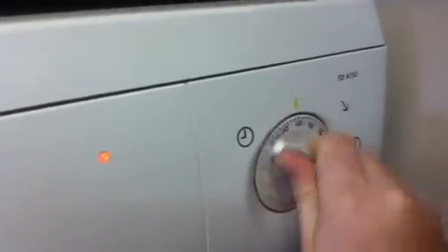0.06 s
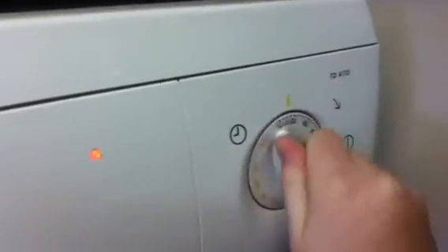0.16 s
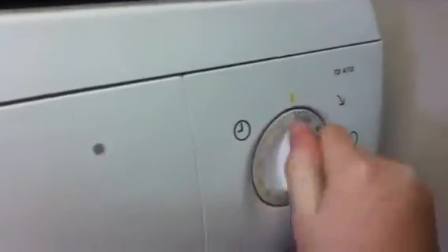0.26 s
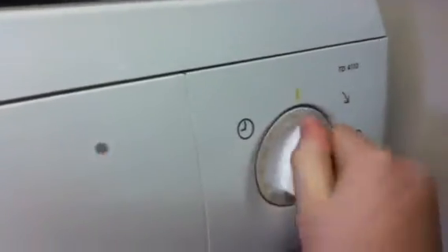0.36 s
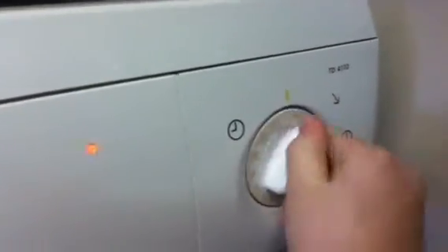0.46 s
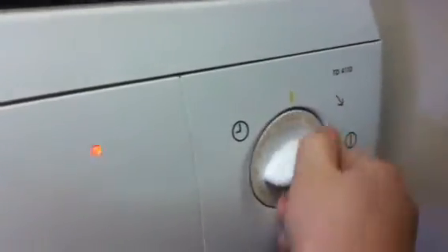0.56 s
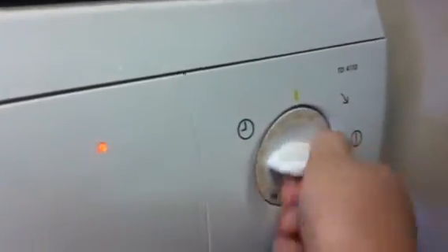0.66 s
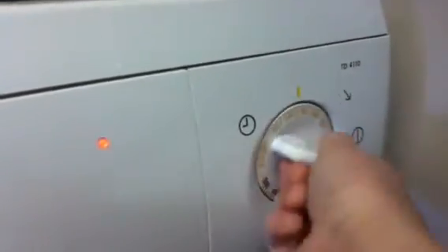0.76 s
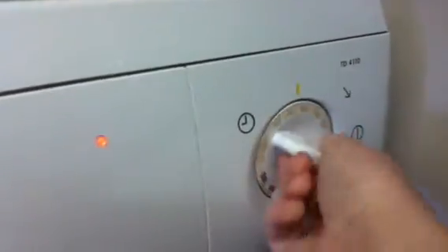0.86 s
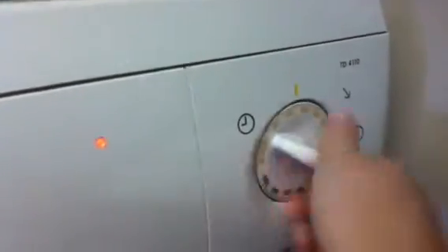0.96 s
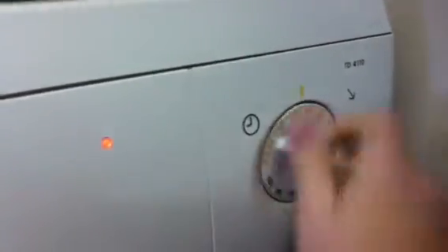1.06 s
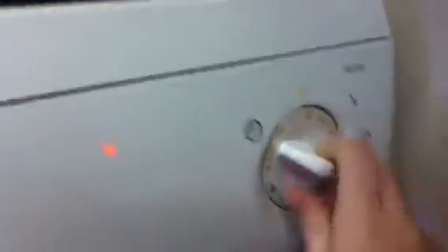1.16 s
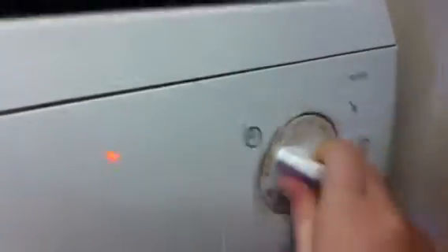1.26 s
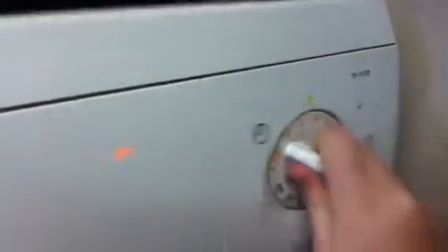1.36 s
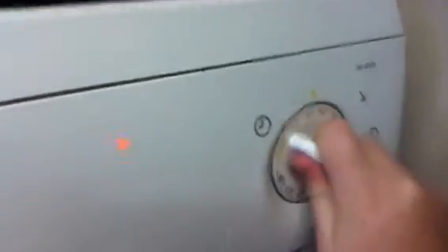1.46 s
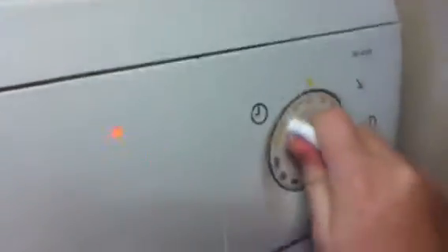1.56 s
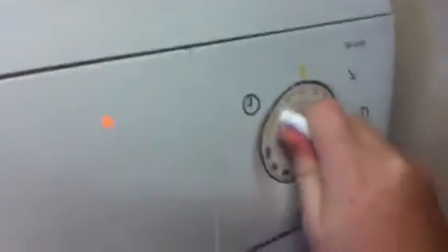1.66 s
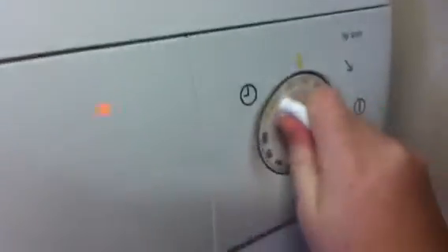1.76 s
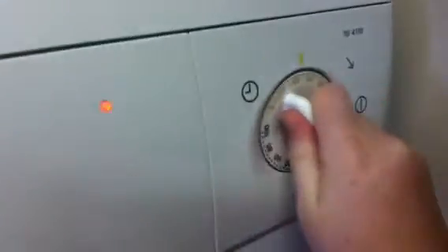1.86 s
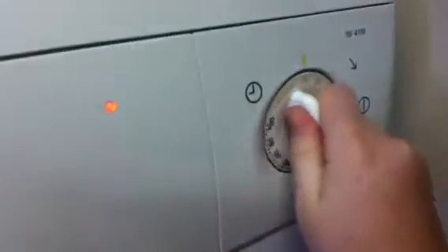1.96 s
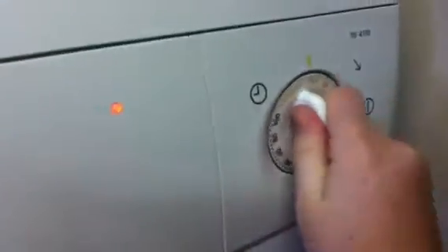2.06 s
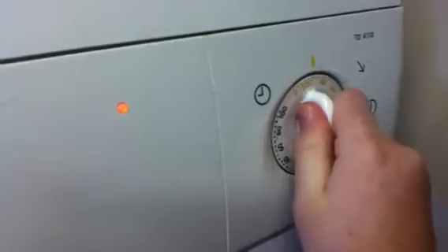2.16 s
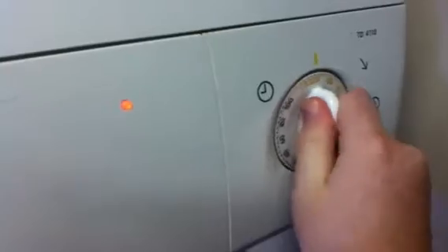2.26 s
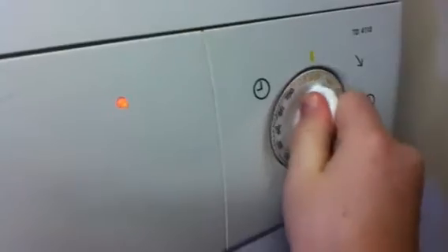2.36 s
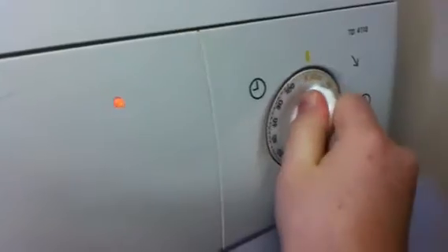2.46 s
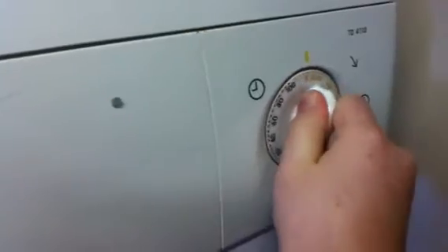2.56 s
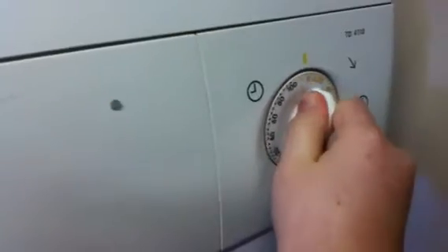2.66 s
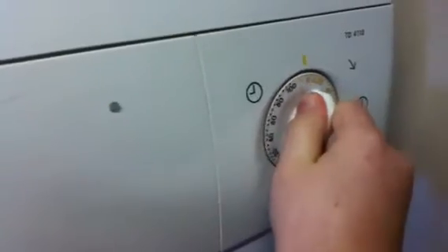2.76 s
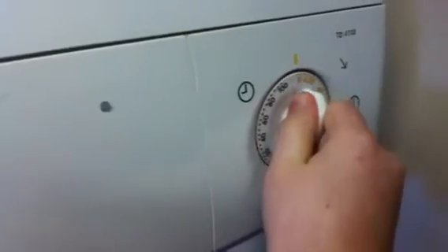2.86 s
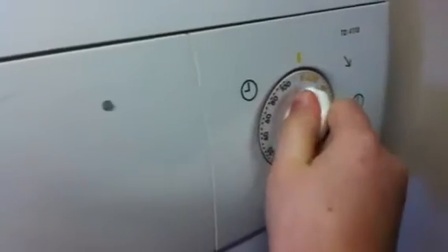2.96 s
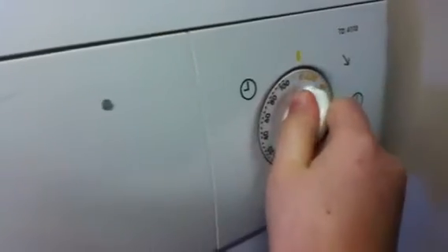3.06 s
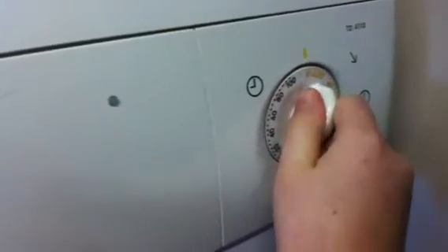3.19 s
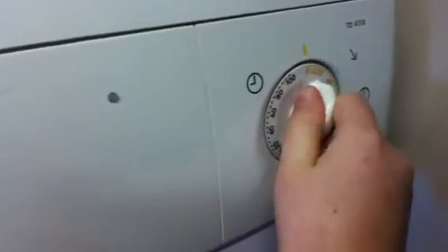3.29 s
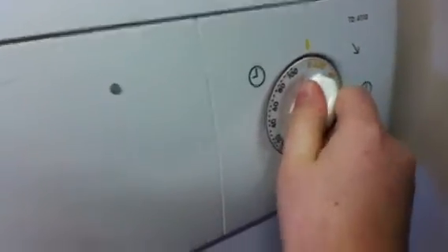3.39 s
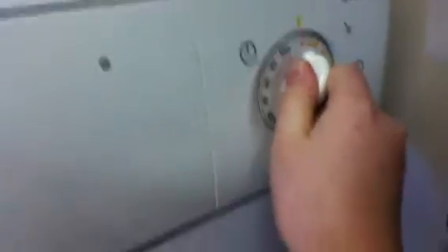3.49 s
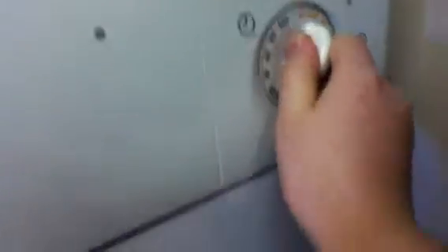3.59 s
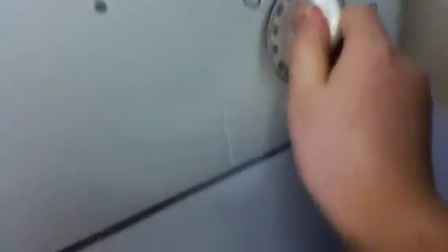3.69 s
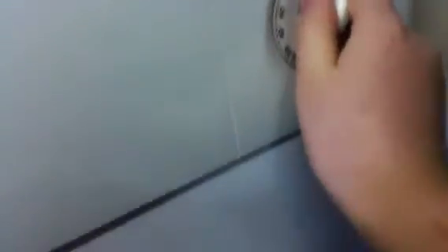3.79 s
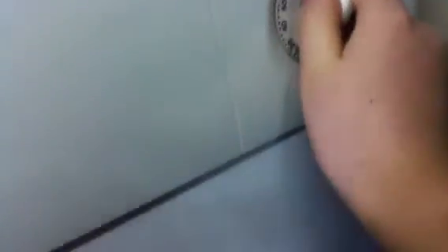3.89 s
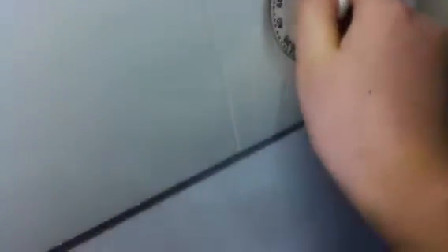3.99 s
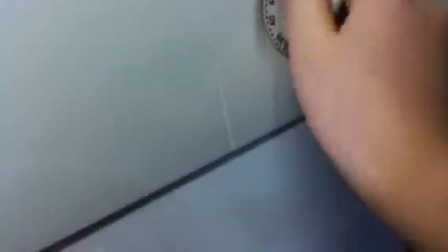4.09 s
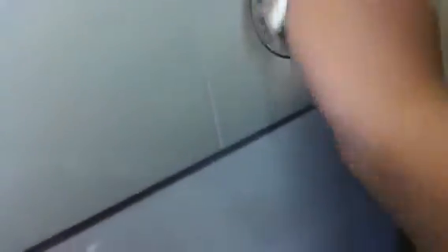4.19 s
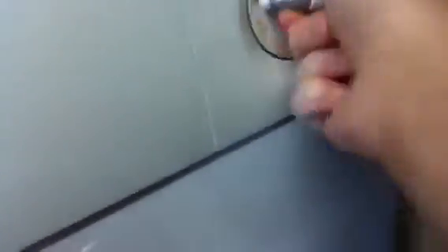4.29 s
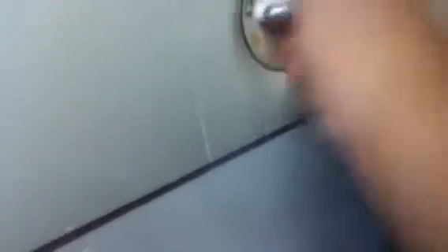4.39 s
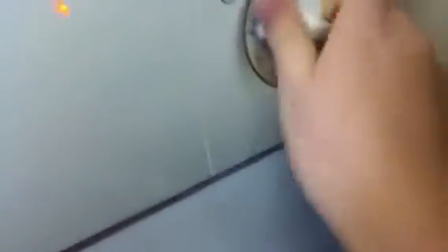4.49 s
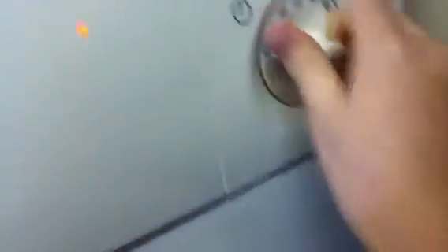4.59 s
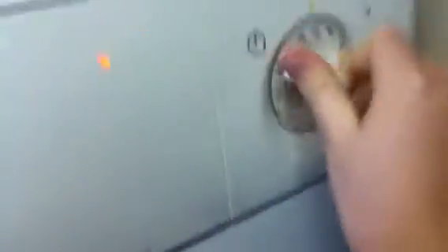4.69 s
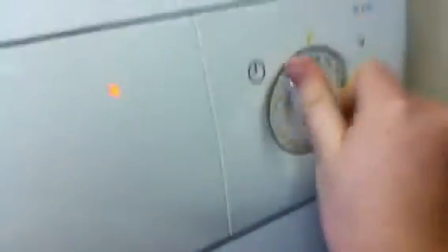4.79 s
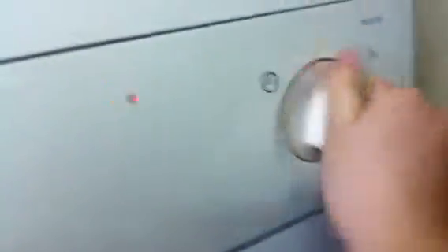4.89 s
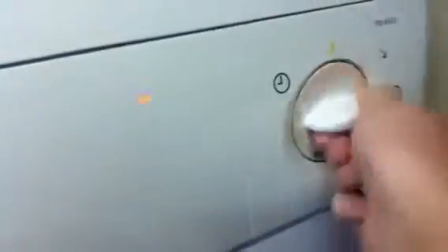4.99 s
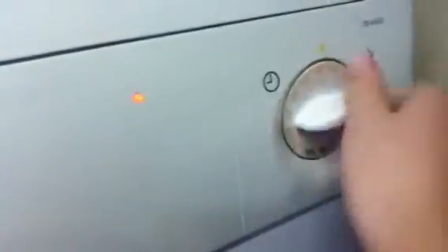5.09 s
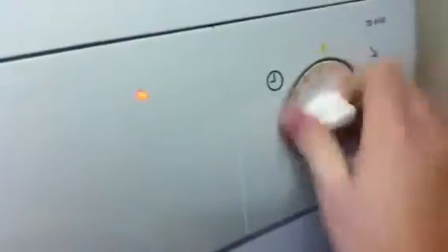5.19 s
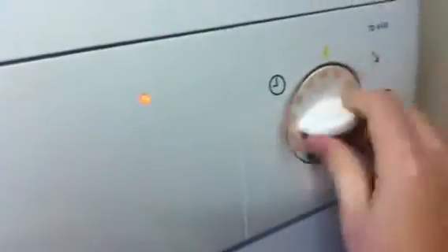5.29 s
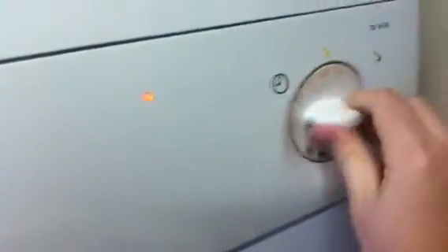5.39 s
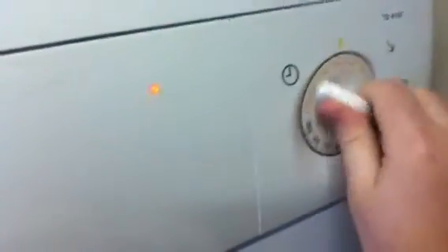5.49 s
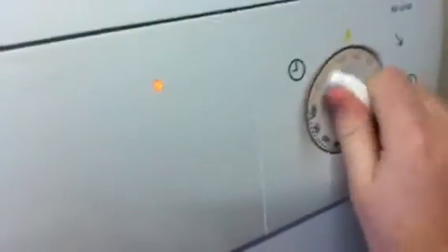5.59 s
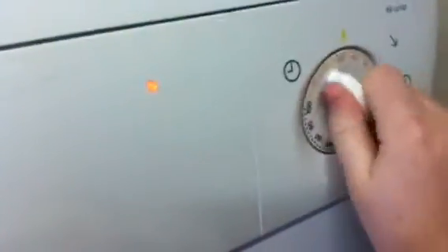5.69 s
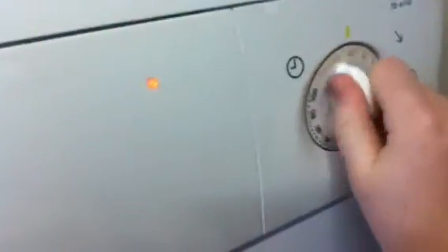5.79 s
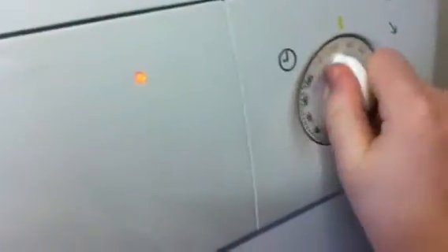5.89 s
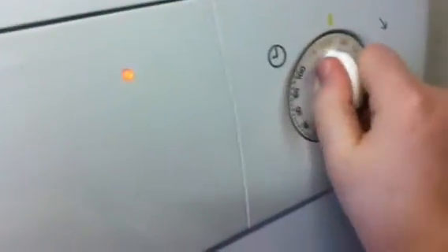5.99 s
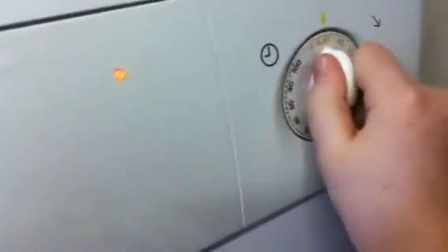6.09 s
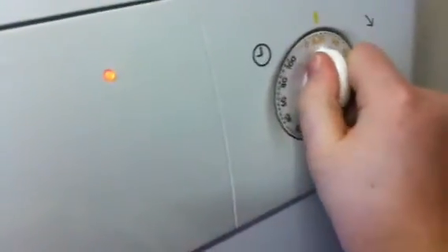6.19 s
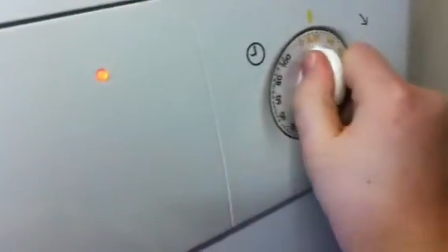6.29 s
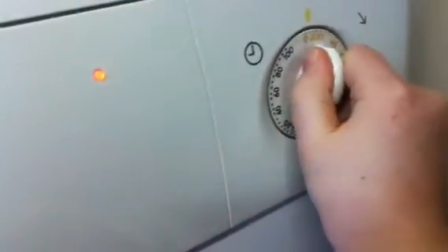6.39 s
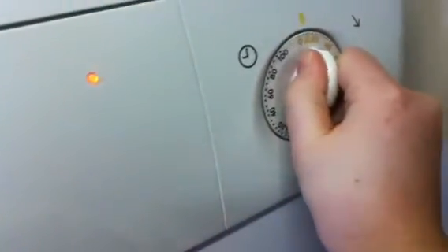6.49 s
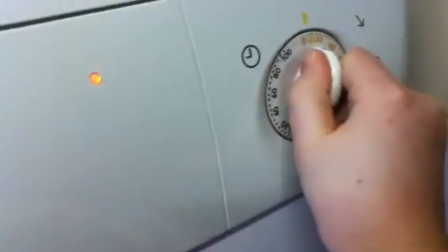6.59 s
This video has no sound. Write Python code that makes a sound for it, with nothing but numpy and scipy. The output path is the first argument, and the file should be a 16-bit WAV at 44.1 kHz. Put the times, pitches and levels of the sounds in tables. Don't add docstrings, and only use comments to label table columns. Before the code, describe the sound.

Close microphone in a small, hard room with low rumble and faint hiss. Skin rubs and fingers tap a knob, then from 0.14 s a timer dial ratchets: hard, bright snaps with a plastic knock and hollow sheet-metal resonance, about fifty a second at the fastest, easing to thirty or so, ending near 0.95 s. Dull finger taps and regripping follow from 1.05 to 1.53 s, the strongest at 1.25 s. From 1.63 to 2.77 s come separate clacks, unevenly spaced, some with a clear ping; the last leaves a faint steel hum. Near quiet until 4.2 s. A quick flick rattles from 4.27 to 4.4 s, fingers knock around 4.5 s, and a dense, scraping spin runs from 4.8 to 5.09 s. More taps until 5.44 s, a short twist of clicks from 5.5 to 5.67 s, then slow single clicks until 6.48 s.

```python
import sys
import numpy as np
from scipy import signal
from scipy.fft import rfft, irfft, next_fast_len
from scipy.io import wavfile
from scipy.ndimage import uniform_filter1d, map_coordinates

SR = 44100
rng = np.random.default_rng(int(sys.argv[2]) if len(sys.argv) > 2 else 0)


def gain_from_decibels(decibels):
    exponent = np.asarray(decibels, float) / 20
    return 10 ** exponent


def to_wav(sig):
    pcm = np.clip(np.atleast_2d(sig), -1, 1) * 32767
    pcm = np.round(pcm).astype(np.int16)
    wavfile.write(sys.argv[1], SR, pcm.T)


N = 293265
LENGTH = 16384
DELAY_S = 0.0012


def along(points, hz):
    f, v = np.transpose(points)
    return np.interp(np.log(hz + 1), np.log(f + 1), v)


def unit(x):
    return x / np.sqrt(np.mean(np.abs(x) ** 2, axis=-1, keepdims=True) + 1e-20)


def coloured(x, spectrum):
    m = next_fast_len(len(x) + LENGTH)
    gain = gain_from_decibels(along(spectrum, np.fft.rfftfreq(m, 1 / SR)))
    return irfft(rfft(x, m) * gain, m)[:len(x)]


def dying(noise, t60s, size):
    hz, t, z = signal.stft(noise, SR, nperseg=size)
    decay = gain_from_decibels(-60 * t / along(t60s, hz)[:, None])
    return signal.istft(z * decay, SR, nperseg=size)[1][..., :noise.shape[-1]]


def mode(centre_hz, width_hz):
    f = np.fft.rfftfreq(LENGTH, 1 / SR)
    damping = 1j * f * width_hz
    return damping / (centre_hz ** 2 - f ** 2 + damping)


def body(modes, count, scatter_db):
    shapes = [(-1) ** k * gain_from_decibels(db) * mode(hz, width) for k, (hz, width, db) in enumerate(modes)]
    strengths = gain_from_decibels(scatter_db * rng.standard_normal((count, len(modes))))
    return strengths @ np.array(shapes)


def placed(times, sounds):
    start = np.round((np.asarray(times) + DELAY_S) * SR).astype(int)
    at = start[:, None] + np.arange(sounds.shape[1])
    return np.bincount(at.ravel(), sounds.ravel(), N + 2 * LENGTH)[:N]


def swells(rows, rise_s, cycles):
    s, db, hz = np.transpose(rows)[:, :, None]
    t = np.arange(2048) / SR
    swell = t / (rise_s + cycles / hz)
    tone = np.sin(2 * np.pi * (hz * t + rng.random(s.shape)))
    return placed(s[:, 0], gain_from_decibels(db) * swell * np.exp(1 - swell) * tone)


# pitch_hz, t60_s
RINGING = [(200, 0.19), (700, 0.23), (1800, 0.16), (4800, 0.092), (8000, 0.064), (13000, 0.067)]
# delay_ms after the landing, level_db
BOUNCES = [
    (.5, -10),
    (1.6, -4),
    (3.399, -7),
]


def blows(times, ringing, diffuse, rise_s, kick_db, hit_db):
    t = np.arange(LENGTH) / SR
    shake = dying(rng.standard_normal((len(times), 2, LENGTH)), RINGING, size=128)
    kick = 1 + gain_from_decibels(kick_db) * np.exp(-t / 0.0039)
    shake = rfft(shake * (1 - np.exp(-t / rise_s)) * kick)
    late = 1 + 0.15 * rng.standard_normal((len(times), 1))
    hz = np.fft.rfftfreq(LENGTH, 1 / SR)
    for ms, db in BOUNCES:
        shake[:, 0] += gain_from_decibels(hit_db + db) * np.exp(-2j * np.pi * hz * late * ms / 1000)
    sounds = irfft(shake * np.stack([ringing, diffuse], axis=1), LENGTH)
    sounds = sounds * np.clip((t[-1] - t) * 10 - 0.1, 0, 1)
    return np.array([placed(times, sounds[:, 0]), placed(times, sounds[:, 1])])


# pitch_hz, level_db per Hz
QUIET = [(25, -11.5), (50, -5.5), (120, 0), (250, -2.5), (450, -9.5), (800, -13), (2000, -17.5),
         (4000, -22), (8000, -21.5), (13000, -27), (15500, -28), (16300, -43)]
# time_s, level_db
QUIET_LEVEL = [(0, -58.5), (1.4, -54.5), (3.2, -60), (4.1, -59.5), (4.7, -56.5), (6.65, -55.5)]


def quiet():
    drift_db = 0.7 * map_coordinates(rng.standard_normal(80), [np.linspace(1, 78, N)])
    level_db = np.interp(np.arange(N) / SR, *np.transpose(QUIET_LEVEL)) + drift_db
    return gain_from_decibels(level_db) * unit(coloured(rng.standard_normal(N), QUIET))


# start_s, end_s, level_db
RUB = [
    (0, -0.002, -47),
    (0.157, 1.09, -50),
    (1.22, 1.32, -49.5),
    (1.6, 2.8, -74),
    (4.203, 4.452, -58),
    (4.548, 4.74, -52),
    (4.8, 5.142, -51),
    (5.3, 6.638, -70),
]
# pitch_hz, level_db per Hz
SKIN = [(150, -5.5), (400, 6.5), (1500, -2.5), (3000, -13.5), (6500, -16), (10000, -23), (15000, -39)]


def rubbing():
    start, end, db = np.transpose(RUB)[:, :, None]
    t = np.arange(N) / SR
    outside_s = np.abs(t - np.clip(t, start, end))
    level_db = np.max(db - 119.5 * outside_s, axis=0)
    unevenness = unit(uniform_filter1d(rng.standard_normal(N), 200))
    slips = rng.standard_normal(N) * gain_from_decibels(3.4 * unevenness)
    return gain_from_decibels(level_db) * unit(coloured(slips, SKIN))


# time_s, strength_db, hardness (-1 pad to 1 nail)
TAPS = [(.0082, -46.5, -0.59), (0.041, -50.5, -1), (0.084, -38, 0.55), (.096, -31, -0.1),
        (1.054, -35, 0.39), (1.0675, -28.5, 0.27), (1.0837, -31, -0.25), (1.0975, -27, -0.24),
        (1.138, -33, 0.35), (1.2361, -23.5, -0.08), (1.2486, -19.5, -0.05), (1.2751, -21, 0.25),
        (1.4729, -25, 0.13), (1.5325, -23, 0.065), (3.6263, -60, 1), (4.1727, -48, 0.27),
        (4.228, -29.5, 0.34), (4.4598, -25.5, 0.15), (4.4663, -28, -0.85), (4.5126, -45, 0.56),
        (4.5267, -34, 0.4), (4.5656, -51, 0.8), (5.156, -22, -0.45), (5.1617, -26, 0.47),
        (5.209, -29.5, -0.21), (5.2335, -27.5, -0.054), (5.282, -35, -0.81), (5.2871, -19, 0.34),
        (5.396, -33, -0.66), (5.4411, -25, 0.075)]
# pitch_hz, width_hz, level_db
KNOB = [(326, 47, 0.5), (656, 95, 5.5), (1050, 270, 2), (1310, 330, 0.5), (1548, 160, 2.5),
        (2150, 580, -5.5)]
NAIL = [(2800, 1200, -4), (3700, 880, -0.5), (4810, 930, -2.5), (6910, 2200, -6.5), (10800, 4500, -25)]
CABINET = [(195, 30.8, 3), (304.4, 36.7, 2), (351, 68.5, -1.5), (493, 46, -3.5), (639, 39.7, -2.5),
           (840, 66, -3)]
# time_s, level_db
LEAN = [(0, -1), (.3, 1.5), (.6, 0), (.95, 0), (1.25, -2.5), (1.6, 2), (1.9, -1), (2.2, -3), (2.55, -0.5),
        (2.77, -2.5), (4.2, 2.5), (4.45, -1.5), (4.85, 2.5), (5.1, -4), (5.35, -0.5), (5.6, -1.5), (6.0, 0),
        (6.5, 1.5)]


def fingers():
    s, db, hard = np.transpose(TAPS)[:, :, None]
    nail_db = db - 6.5 + 16.5 * hard
    cabinet_db = db - 0.5 - 11 * hard + np.interp(s, *np.transpose(LEAN))
    knob_db = db - 12.5 * hard ** 2
    n = len(s)
    nail = gain_from_decibels(nail_db + 2.0) * body(NAIL, n, scatter_db=-0.5)
    cabinet = gain_from_decibels(cabinet_db + 8.5) * body(CABINET, n, scatter_db=3.0)
    knob = gain_from_decibels(knob_db + 6.0) * body(KNOB, n, scatter_db=1.2)
    return blows(s[:, 0], knob, nail + cabinet, rise_s=0.000603, kick_db=2.5, hit_db=18.5)


# pitch_hz, t60_s
ROOM = [(200, 1.11), (600, 0.65), (1800, 0.48), (5000, 0.1665), (12000, 0.18)]
# pitch_hz, level_db
WET = [(60, -2.5), (200, -8.5), (600, -13), (2000, -19.5), (5000, -10.5), (12000, -18)]


def room(x, tail):
    delayed = np.pad(x, (300, 0))
    wet = signal.fftconvolve(delayed, tail / np.linalg.norm(tail))[:N]
    return coloured(wet, WET)


# time_s, peak_db, pitch_hz
THUDS = [(0.095, -33, 650), (1.067, -34, 340), (1.097, -19, 1345), (1.139, -33, 350), (1.237, -26, 287),
         (1.2495, -14, 1100), (1.277, -17.5, 310), (1.474, -27, 630), (1.532, -20, 1520), (4.23, -25, 323),
         (4.465, -14.5, 655), (5.155, -28, 1076), (5.16, -27, 702), (5.209, -21, 310), (5.232, -22, 337),
         (5.289, -20, 920), (5.397, -23, 700), (5.441, -20.5, 342)]
# time_s, peak_db, pitch_hz
SWINGS = [(0.1528, -12, 2240), (0.1897, -8.5, 2430), (0.2246, -14.5, 1500), (0.2451, -13, 1950),
          (0.2655, -6.5, 2200), (0.3449, -11.5, 2130), (0.3635, -12, 1570), (0.3929, -14, 1870),
          (0.447, -13, 1590), (0.4721, -20.5, 1590), (0.5143, -14, 1580), (0.5519, -12, 2140),
          (0.5977, -14, 2160), (0.6325, -17, 1950), (0.6532, -19, 2150), (0.6721, -15.5, 1390),
          (0.6906, -20, 1945), (0.733, -17, 1930), (0.7575, -32, 1880), (0.7799, -18, 2050),
          (0.8166, -18, 1600), (0.8582, -18, 1350), (0.877, -25, 1610), (0.9113, -17, 1580),
          (0.9505, -14.5, 1860), (1.0535, -35, 1420), (1.0632, -28.5, 1450), (1.0762, -24.5, 1960),
          (1.0972, -21, 1290), (1.1401, -26, 1570), (1.2433, -29, 1530), (1.2493, -14.5, 1494),
          (1.4444, -45, 1390), (1.4735, -27, 1550), (1.5356, -17, 1480), (1.61, -32, 1540),
          (1.6299, -14.5, 1810), (1.7058, -7.5, 1670), (1.8011, -37.5, 1420), (1.86, -11, 1705),
          (1.9449, -13, 1595), (2.032, -15, 1964), (2.0826, -10, 1934), (2.1468, -14, 1800),
          (2.2051, -13, 1610), (2.2648, -18, 1640), (2.3583, -25, 2300), (2.4038, -17.5, 1720),
          (2.476, -26, 1770), (2.5155, -18.5, 1640), (2.5894, -14.5, 1610), (2.7741, -15, 1936)]
LATER_SWINGS = [(4.2733, -12, 2080), (4.3262, -12, 1540), (4.3596, -6.5, 1910), (4.407, -16, 1890),
                (4.4609, -32, 1620), (4.5292, -43, 1890), (4.629, -46, 2190), (4.7173, -42, 1410),
                (4.745, -44, 2157), (4.803, -13, 1300), (4.8654, -17, 2010), (4.8854, -18, 1910),
                (4.9183, -9, 2110), (4.9338, -10, 2070), (4.9532, -4.5, 2150), (5.035, -9, 1880),
                (5.1565, -31, 1620), (5.2147, -30, 1950), (5.2326, -32, 1610), (5.2888, -24, 1460),
                (5.3967, -27, 1340), (5.4415, -34, 1500), (5.509, -19, 1320), (5.5354, -10, 1590),
                (5.5978, -16, 1910), (5.632, -31, 2000), (5.6711, -26, 1510), (5.791, -16, 1380),
                (5.8435, -15.5, 1430), (5.9036, -18, 1910), (5.9714, -13, 1890), (6.0243, -21, 1960),
                (6.1281, -41, 1380), (6.144, -19, 1390), (6.2214, -14.5, 1613), (6.4269, -17, 1530),
                (6.4784, -15, 1580)]


def knocks():
    thuds = swells(np.subtract(THUDS, [DELAY_S, 0, 0]), rise_s=0.00034, cycles=0.84)
    swings = swells(list(SWINGS) + list(LATER_SWINGS), rise_s=0.0022, cycles=0.6)
    return gain_from_decibels(-8.0) * swings + gain_from_decibels(-5.0) * thuds


# time_s, strength_db, pawl_pitch_hz, gear_rattle_db over the strength
SWEEP = [(.1442, -13, 4874, -1), (.1518, -12, 5380, 0.5), (.1868, -15, 5380, 0.5), (.1965, -14, 4250, 5),
         (.2228, -13.5, 5330, 0.5), (.2434, -14, 5340, 4.5), (.2649, -9.5, 4150, -2.5),
         (.2839, -9, 4350, -4.5), (.309, -12.5, 4320, 1)]
EASING = [(0.3434, -12, 4820, -1), (0.36, -11, 4640, -0.5), (.389, -13.5, 4800, 2.5),
          (0.411, -11.5, 4620, -0.5), (0.4459, -11, 4560, -2), (0.4701, -10, 4530, -2.5),
          (0.5086, -13.5, 4500, 0), (.552, -20, 4740, 8), (0.5561, -16.5, 4700, 4.5),
          (0.596, -16.5, 5030, 2)]
SWEEP_ON = [(0.631, -12.5, 4160, -4.5), (0.6505, -14.5, 5070, 3), (0.67, -12.5, 4600, -1.5),
            (0.686, -11, 4620, -3), (0.7069, -12, 4780, -1.5), (0.732, -16, 5020, 2),
            (0.754, -12.5, 5180, -0.5), (0.777, -15.5, 4150, 1), (0.813, -12, 5090, -1),
            (0.8346, -13, 4770, -2), (0.8564, -11, 4200, -1), (0.875, -10.5, 4950, -3.5),
            (0.9061, -17, 4540, 4.5), (0.9121, -19, 4560, -6), (0.9451, -14.5, 4460, 0.5)]
STEPS = [(1.6281, -14.5, 4520, 5), (1.7029, -8, 4600, -2), (1.8586, -9.5, 4930, -2.5),
         (1.9408, -12.5, 4520, 1), (2.03, -10.5, 4770, -4.5), (2.0816, -13.5, 4680, -2.5),
         (2.1451, -15.5, 4510, -1.5), (2.202, -15, 4630, 1), (2.2618, -18, 4540, 2),
         (2.3562, -19, 4200, 1.5), (2.3997, -14, 4380, -1.5), (2.4727, -15.5, 4560, 0.5),
         (2.513, -14.5, 4230, 1.5), (2.5872, -12, 5020, 0.5), (2.7694, -13.5, 4450, 3)]
FLICK = [(4.268, -8.5, 4500, -1), (4.282, -9, 4620, -4), (4.2969, -16, 4060, 2.5),
         (4.3175, -11.5, 4800, -4), (4.3245, -17, 4840, 5), (4.3413, -12.5, 4260, 4.5),
         (4.358, -13, 4330, 5), (4.3634, -13, 4170, 1), (4.3768, -12, 4200, 0), (4.39, -23.5, 4400, 2),
         (4.4032, -11, 4100, -0.5)]
SPIN = [(4.8011, -12.5, 5560, -3.5), (4.8163, -16.5, 4700, 4.5), (4.8374, -12.5, 5160, -1),
        (4.8628, -12.5, 5040, -0.5), (4.8827, -8, 3970, -5.5), (4.8911, -12, 4620, -3),
        (4.917, -11, 4370, 2), (4.9244, -13, 4660, 0), (4.9314, -8.5, 5460, -8), (4.9511, -13, 4730, -1),
        (4.9558, -9, 4150, -5), (4.967, -14, 4900, -3), (4.984, -14.5, 4060, 3.5),
        (4.991, -15.5, 4580, 3.5), (5.0248, -19, 4240, 7.5), (5.03, -9, 4640, 1), (5.05, -10.5, 5130, -2.5),
        (5.061, -11, 4970, -0.5), (5.078, -14.5, 4270, 1), (5.088, -17, 4800, 2)]
TWIST = [(5.502, -12.5, 4080, -1.5), (5.508, -12, 4170, 0), (5.5251, -9.5, 5180, -3.5),
         (5.535, -9.5, 4000, -2), (5.5533, -11, 4480, 1), (5.5929, -20, 4800, 6), (5.608, -16.5, 4630, -2),
         (5.631, -15, 4690, 0.5), (5.637, -15.5, 4770, 1), (5.6706, -13, 4740, -2)]
LAST_STEPS = [(5.7872, -13.5, 4520, -1.5), (5.8399, -14.5, 4680, 0), (5.9006, -13, 4310, -3),
              (5.969, -14.5, 4450, -2), (6.022, -17.5, 4870, 1.5), (6.142, -15.5, 4000, 0.5),
              (6.22, -12.5, 4390, 0), (6.422, -15, 4940, -1), (6.475, -16.5, 4630, 4)]
# panel_db, cabinet_db, pawl_ring_db relative to the snap, stem_db relative to the crack
GRIPS = [
    (-2, -9, -5.5, -0.5),
    (-4, -7.5, -3, -1.5),
    (-4, -9, 0, -2.5),
    (-5, -9, -2, -5),
    (-8.5, -9.5, -2, -4.5),
    (-3, -8, -2.5, -0.5),
    (-4, -8, -2.5, 2),
    (-2.5, -8.5, -2.5, 0.5),
]
PAWL_HZ, PAWL_SPAN_HZ, OFF_PITCH_DB = 4620, 700, 7.5
CABINET_FOLLOWS, USUAL_DB = 0.14, -11.5


def snaps():
    turns = [SWEEP, EASING, SWEEP_ON, STEPS, FLICK, SPIN, TWIST, LAST_STEPS]
    s, db, pitch, rattle_db = np.vstack(turns).T[:, :, None]
    grips = np.repeat(GRIPS, [len(turn) for turn in turns], axis=0)
    panel, cabinet, ring, stem_db = grips.T[:, :, None]
    ring = ring - OFF_PITCH_DB * ((pitch - PAWL_HZ) / PAWL_SPAN_HZ) ** 2
    cabinet_db = USUAL_DB + CABINET_FOLLOWS * (db - USUAL_DB) + cabinet
    return s, db + rattle_db, db + panel, cabinet_db, pitch, db + ring, stem_db


# pitch_hz, level_db
CRACK = [(40, -35), (150, -28.5), (600, -13), (1500, -7.5), (3000, -9.5), (5000, -8), (7500, -12.5),
         (10000, -15.5), (13000, -22), (15000, -29), (16300, -48)]


def slipping():
    s, crack_db = snaps()[:2]
    t = np.arange(512) / SR
    growth = np.exp((t - t[-1]) / 0.0025)
    scrape = gain_from_decibels(crack_db - 16) * growth * rng.standard_normal((len(s), len(t)))
    return coloured(placed(s[:, 0] - t[-1], scrape), CRACK) * gain_from_decibels(11.0)


# pitch_hz, width_hz, level_db
PAWL = [(3423, 90, -6.5), (3750, 200, -8), (5410, 170, -4.5), (6440, 380, -3), (7270, 410, -11),
        (8470, 590, -9.5), (9600, 500, -26.5), (12160, 870, -16.5)]
PANEL = [(912, 200, -3), (1340, 230, -2), (1580, 98, 3.5), (1910, 150, 1.5), (2220, 250, -1.5),
         (2490, 195, -3.5), (2596, 62, -4.5)]


def ratchet():
    s, crack_db, panel_db, cabinet_db, pitch, ring_db, stem_db = snaps()
    n = len(s)
    stem = gain_from_decibels(stem_db + 2.5) * mode(centre_hz=3102, width_hz=210)
    gears = gain_from_decibels(crack_db + 1.5) * (body(PAWL, n, scatter_db=1.5) - stem)
    gears = gears + gain_from_decibels(ring_db + 2.5) * mode(pitch, width_hz=590)
    lean_db = np.interp(s, *np.transpose(LEAN))
    cabinet = gain_from_decibels(cabinet_db + lean_db) * body(CABINET, n, scatter_db=1.5)
    panel = gain_from_decibels(panel_db + 3.0) * body(PANEL, n, scatter_db=1.5)
    ringing = gears + panel + gain_from_decibels(8.0) * cabinet
    crack = gain_from_decibels(crack_db + 4.0 + along(CRACK, np.fft.rfftfreq(LENGTH, 1 / SR)))
    return blows(s[:, 0], ringing, crack + gain_from_decibels(8.5) * cabinet, rise_s=0.0007, kick_db=1.5, hit_db=19.0)


SEAT_S, SEATED_DB = 0.04, 11.5


def pawl():
    s, _, panel_db, _, pitch, ring_db, _ = snaps()
    seated = np.diff(s, axis=0, prepend=0) > SEAT_S
    t = np.arange(1024) / SR
    phase = 2 * np.pi * rng.random((5, len(s), 1))
    ping = np.sin(2 * np.pi * pitch * t + phase[0])
    ping = ping + 0.41 * np.sin(2 * np.pi * 1.07 * pitch * t + phase[1])
    ping = ping + gain_from_decibels(SEATED_DB * seated - 10.5) * np.sin(2 * np.pi * 1.57 * pitch * t + phase[2])
    swing = np.sin(2 * np.pi * 1905 * t + phase[3]) + 0.67 * np.sin(2 * np.pi * 1585 * t + phase[4])
    swell, slow_swell = t / 0.0013, t / 0.002
    ping = gain_from_decibels(ring_db - 5.5) * swell * np.exp(1 - swell) * ping
    swing = gain_from_decibels(panel_db - 13.5) * slow_swell * np.exp(1 - slow_swell) * swing
    return placed(s[:, 0], ping + swing)


# time_s, peak_db
TICKS = [
    (1.113, -36),
    (1.125, -40),
    (4.128, -56),
    (.1458, -16),
    (.188, -18),
    (4.318, -18),
    (4.4058, -16),
    (5.5485, -15),
    (1.2497, -10),
]


def ticks():
    s, db = np.transpose(TICKS)[:, :, None]
    t = np.arange(1024) / SR
    spike = gain_from_decibels(db + 3) * np.sin(2 * np.pi * 2000 * t) * np.exp(-t / 0.0003)
    rattle = gain_from_decibels(db - 1.0) * rng.standard_normal((len(s), len(t))) * np.exp(-t / 0.003)
    at = s[:, 0] - DELAY_S
    return placed(at, spike) + coloured(placed(at, rattle), CRACK)


# time_s, level_db
DRAG = [
    (.28, -20),
    (.5, -32),
    (.758, -21.5),
    (4.35, -16.5),
    (4.975, -13.5),
    (5.66, -31),
]


def dragging():
    t = np.arange(N) / SR
    gain = sum(gain_from_decibels(db - 8.5 - 301.5 * np.abs(t - s)) for s, db in DRAG)
    unevenness = unit(uniform_filter1d(rng.standard_normal(N), 120))
    grit = rng.standard_normal(N) * gain_from_decibels(3.5 * unevenness)
    return gain * unit(coloured(grit, CRACK))


# time_s, peak_db, pitch_hz
PINGS = [(0.3113, -12, 4660), (0.346, -7, 4700), (0.3893, -8, 4640), (0.4124, -12, 4570),
         (0.447, -10.5, 4940), (0.4708, -7, 4560), (0.5104, -16, 4760), (0.5587, -8.5, 4700),
         (0.5982, -14.5, 5160), (0.654, -20, 4610), (0.6705, -9, 5410), (0.69, -13, 4600),
         (0.7096, -9, 4670), (0.7328, -13, 5086), (0.814, -9.5, 5140), (0.8361, -9, 5130),
         (0.9466, -15, 4420), (1.535, -31, 5530), (1.6306, -14, 4460), (1.7047, -9.5, 4300),
         (1.861, -8, 4720), (1.9433, -6.5, 4740), (2.0312, -7.5, 4790), (2.0836, -4, 4790),
         (2.147, -12, 4890), (2.2035, -15, 5000), (2.2645, -19, 4430), (2.3582, -15, 4320),
         (2.4021, -9.5, 4440), (2.4737, -10, 4530), (2.515, -11.5, 4320), (2.5886, -11.5, 5010),
         (2.7712, -10, 4660), (4.2303, -20.5, 4620), (4.2701, -10, 4670), (4.3247, -15, 4810),
         (4.8035, -9.5, 5520), (5.0321, -10, 4900), (5.29, -35, 4800), (5.51, -25, 4400),
         (5.5948, -16, 4760), (5.6335, -9, 4760), (5.672, -13, 4780), (5.789, -19, 4600),
         (5.8427, -8.5, 4580), (5.9023, -19, 4220), (5.9705, -20, 4750), (6.023, -16, 5500),
         (6.1448, -29, 5500), (6.2224, -7, 4700), (6.4234, -22, 4770), (6.4768, -24, 4650),
         (4.2842, -6, 4500), (4.3665, -10, 4200), (4.9683, -9, 4700), (5.0605, -11, 4900),
         (5.0895, -7.5, 4780), (4.3795, -13, 4470)]


def pings():
    early = np.subtract(PINGS, [DELAY_S, 0, 0])
    upper = early * [1, 1, 1.56] + [0, -10, 0]
    lower = early * [1, 1, 0.92] + [0, -7.5, 0]
    higher = early * [1, 1, 1.09] + [0.0012, -8, 0]
    ping = swells(early, rise_s=0.0011, cycles=1.3)
    ping = ping + swells(upper, rise_s=0.00088, cycles=1.2)
    ping = ping + swells(lower, rise_s=0.00088, cycles=1.2)
    return gain_from_decibels(-6.0) * (ping + swells(higher, rise_s=0.0011, cycles=1.2))


# time_s, pitch_hz, level_db, t60_s
SINGING_ON = [
    (2.592, 5990, -50, .4),
    (2.775, 445, -54, 1.5),
]


def singing_on():
    s, hz, db, t60 = np.transpose(SINGING_ON)[:, :, None]
    t = np.clip(np.arange(N) / SR - s, 0, None)
    return np.sum(gain_from_decibels(db - 60 * t / t60) * np.sin(2 * np.pi * hz * t), axis=0)


def scene():
    air = quiet()
    ringing, diffuse = fingers() + ratchet()
    ringing = ringing + pawl() + knocks() + slipping()
    diffuse = diffuse + rubbing() + dragging()
    near = ticks() + pings()
    tail = dying(rng.standard_normal(SR), ROOM, size=256)
    wet = room(diffuse + gain_from_decibels(-7.5) * ringing, tail)
    return (ringing + near + diffuse + wet + singing_on() + air)[None]


# pitch_hz, level_db
SURVIVE = [(1000, -57), (2000, -31.5), (5000, -28), (8000, -21), (12000, -13.5), (16000, -9)]
BLOCK, BLOCK_START = 1024, 472
SUDDEN_DB = 7.5
STARVED_HZ, STARVE_HZ_PER_DB, STARVE_SCATTER_HZ = 15900, 45.5, 503
STARVE_FROM_DB, MASKED_DB = -63, -48


def dropped(x):
    hz, t, z = signal.stft(x, SR, nperseg=256)
    power = uniform_filter1d(np.abs(z) ** 2, size=7, axis=0)
    block = (np.round(t * SR).astype(int) + BLOCK - BLOCK_START) // BLOCK
    starts = np.searchsorted(block, np.unique(block))
    loudest = np.maximum.reduceat(power, starts, axis=1)[:, block]
    chance = rng.standard_normal((len(hz), len(starts)))
    band = np.arange(len(hz)) // 5
    scatter_db = 2.5 * chance[band][:, block]
    keep = power > loudest * gain_from_decibels(2 * (along(SURVIVE, hz)[:, None] + scatter_db))
    total = power[hz > 900].sum(axis=0) + 1e-12
    mean = np.add.reduceat(total, starts) / np.bincount(block)[np.unique(block)]
    peak = np.maximum.reduceat(total, starts)
    even = peak < mean * gain_from_decibels(SUDDEN_DB)
    over_db = np.clip(10 * np.log10(mean) - STARVE_FROM_DB, 0, 40)
    top_hz = STARVED_HZ - even * over_db * (STARVE_HZ_PER_DB + STARVE_SCATTER_HZ / 20 * chance[-1])
    keep = keep * ((hz[:, None] < top_hz[block]) | ~even[block])
    hidden = power < peak[block] * gain_from_decibels(2 * (MASKED_DB + scatter_db))
    keep = keep * ~(hidden & (hz[:, None] > 7500) & (2 * total < peak[block]))
    return signal.istft(z * keep, SR, nperseg=256)[1][:N]


def low_pass(x):
    return signal.sosfilt(signal.butter(12, 16650, fs=SR, output="sos"), x)


def record(dry):
    rounded = dry[0] / (1 + np.abs(dry[0] / 0.85) ** 4) ** (1 / 4)
    limited = coloured(rounded, [(15700, 0), (16300, -50)])
    mix = dropped(limited)[None]
    return low_pass(mix)


dry = scene()
out = record(dry)
to_wav(out)
```